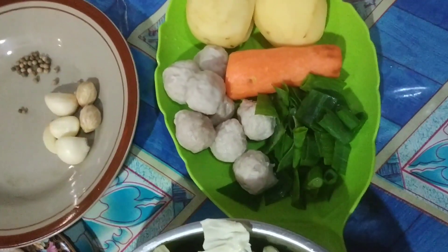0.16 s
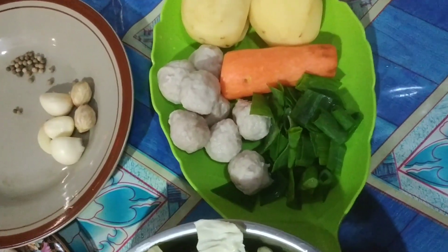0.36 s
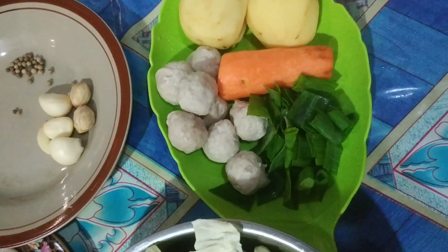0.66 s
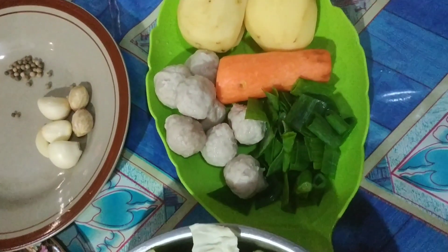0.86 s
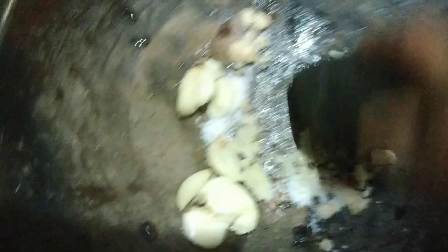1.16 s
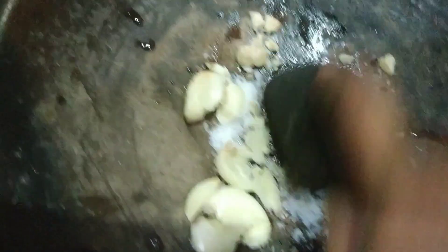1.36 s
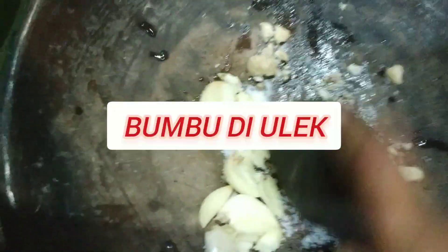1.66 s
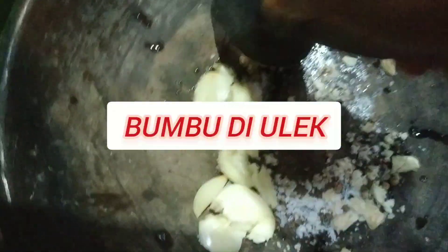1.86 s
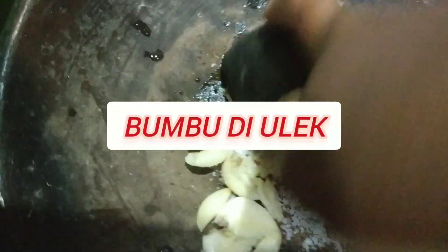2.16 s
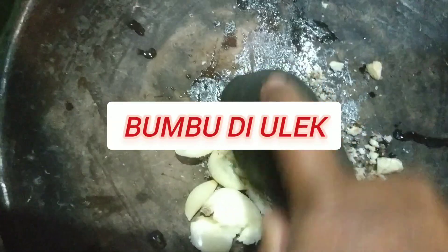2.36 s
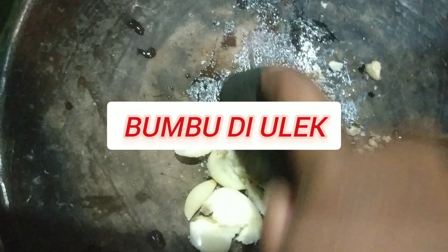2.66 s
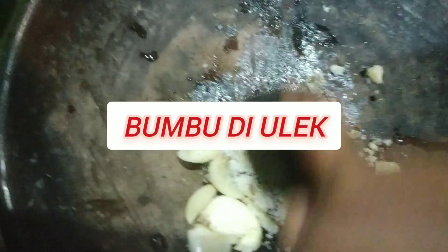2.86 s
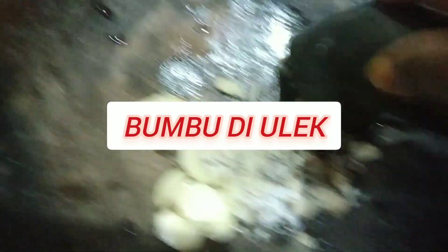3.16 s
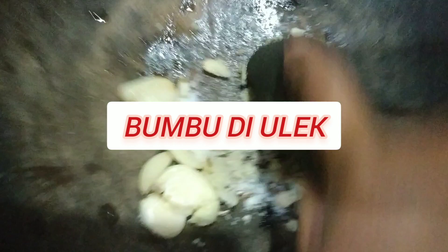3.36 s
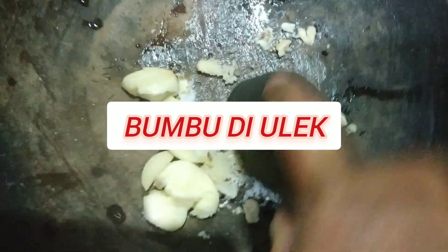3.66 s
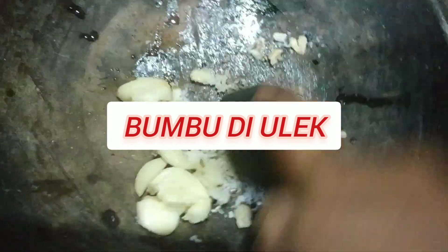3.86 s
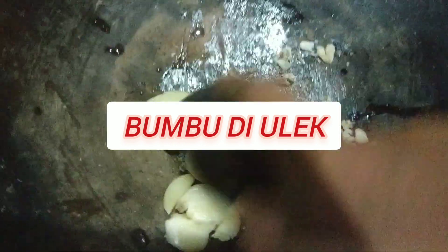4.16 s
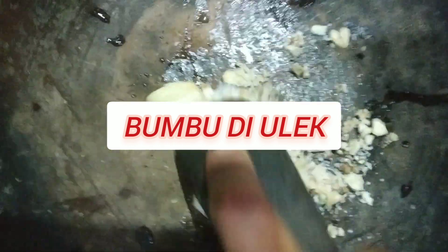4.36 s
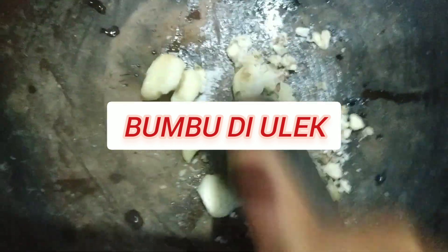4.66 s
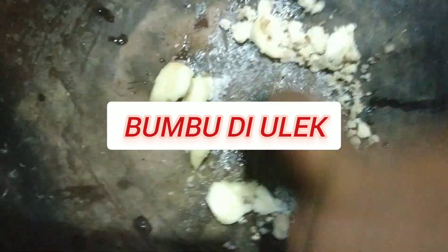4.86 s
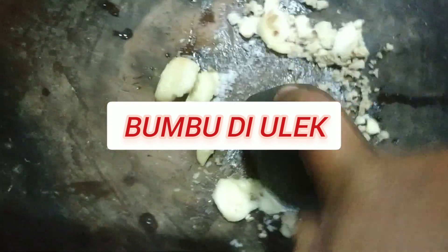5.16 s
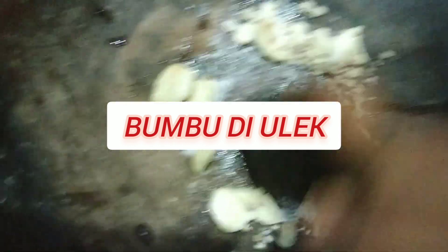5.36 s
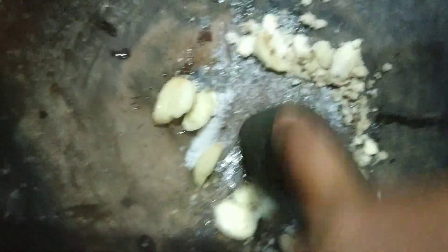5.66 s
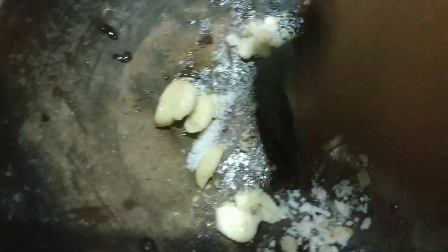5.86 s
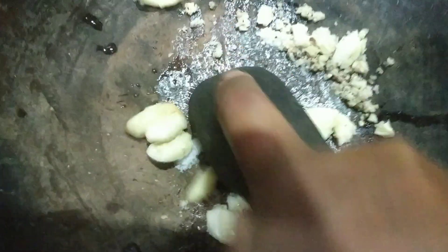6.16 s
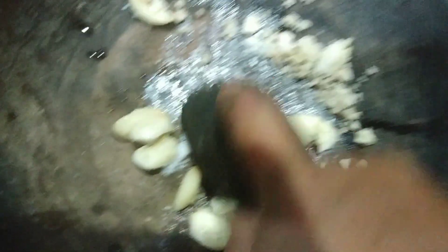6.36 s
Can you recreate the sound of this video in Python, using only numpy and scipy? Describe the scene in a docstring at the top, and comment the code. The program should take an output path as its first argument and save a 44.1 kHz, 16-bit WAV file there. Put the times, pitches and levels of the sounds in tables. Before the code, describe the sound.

Low room murmur and hiss, a short dead silence, then a stone pestle grinding garlic, salt and seeds in a stone mortar with gritty crunches.

```python
"""A stone pestle grinds salt, seeds and garlic in a stone mortar, about seven pushes a second, in a quiet kitchen.
Each push crushes a stream of grit: random fractures that hiss, ring the stone and shake the table.
Seeds burst as short dense fracture bursts; the pestle knocks dully, as damped modes, when it drops off them.
Murmur and hiss come first, then a moment of silence, then the grinding over a faint added drone.
Two microphones of a phone just above the bowl differ in level, phase and likeness by frequency."""
import sys
import numpy as np
from scipy import signal
from scipy.fft import rfft, irfft
from scipy.io import wavfile
from scipy.ndimage import uniform_filter1d

SR = 44100
rng = np.random.default_rng(int(sys.argv[2]) if len(sys.argv) > 2 else 0)


def transcribe(u):
    """Save the signal u as a 16-bit wav file named by the first command-line argument.

    u: samples, shape (n,) or (channels, n), limited to [-1, 1]; the rate is SR.
    q: integer samples, one column per channel.
    """
    v = np.clip(np.atleast_2d(u).T, -1, 1)
    q = np.round(v * 32767).astype(np.int16)
    wavfile.write(sys.argv[1], SR, q)


N = 287973
TIME = np.arange(N) / SR
FREQS = np.fft.rfftfreq(N, 1 / SR)

# silent span: start_s, end_s
SILENCE_S = (1.1, 1.449)
# bursting seeds and salt crystals: time_s, level_db, fall_db (drop onto the stone, re level_db)
BURSTS = [(1.625, -4, -24), (1.6467, -4, -26), (1.909, -11, -10.5), (2.091, -5.5, -20),
          (2.6707, 0.5, -22.5), (3.117, -26, -39), (3.1929, -10, -6.5), (3.26, -8, -26),
          (3.2661, -7, -14.5), (3.301, -4.5, -12), (3.346, -7, -8.5), (3.3702, -4, -34), (3.376, -8, -31),
          (3.5783, -5, -13), (3.6143, -3, -17), (4.28, -13, -9.5), (4.5393, -7, -7.5), (5.026, -2, -27),
          (5.129, -13, -34), (5.273, -12, -25), (5.4335, -15, -25), (5.878, -9.5, -11.5),
          (5.937, -17.5, -15.5), (6.062, -11, -10.5)]
# sharp modes of mortar and pestle: pitch_hz, width_hz, relative_db
STONE_MODES = [(1273, 82, -3.5), (1343, 69, -4.5), (1500, 220, -1), (1768, 200, -1), (1840, 76, -11)]
# spectrum of a sharp snap: freq_hz, relative_db
SNAP_SPECTRUM = [(200, -10.5), (700, -1.5), (1300, -12), (2500, 7.5), (4700, 5), (8000, 2), (12000, -6),
                 (16000, -7)]


def amp(db):
    """Decibels to gain."""
    return 10 ** (np.asarray(db) / 20)


def unit(x):
    """Scales to an rms of one."""
    return x / np.sqrt(np.mean(x ** 2) + 1e-20)


def read(points, hz):
    """Interpolates a table along a log-frequency axis."""
    f, value = np.transpose(points)
    return np.interp(np.log(hz + 1), np.log(f + 1), value)


def read_time(points, s):
    """Interpolates a table linearly in time."""
    point_s, value = np.transpose(points)
    return np.interp(s, point_s, value)


def add(mix, s, sound):
    """Mixes a sound in at time s."""
    part = mix[..., max(round(s * SR), 0):][..., :sound.shape[-1]]
    part += sound[..., :part.shape[-1]]


def pan(pan_db):
    """Left and right gains, pan_db apart."""
    return amp([[pan_db / 2], [-pan_db / 2]])


def filter_unit_energy(x, taps):
    """Convolves both channels with taps scaled to unit energy."""
    return signal.oaconvolve(x, taps[None] / np.linalg.norm(taps), axes=1)[:, :N]


def colour(x, spectrum, size=2048):
    """Minimum-phase filter of unit energy with the given spectrum."""
    log_gain = np.log(amp(read(spectrum, abs(np.fft.fftfreq(size, 1 / SR)))))
    taps = np.fft.ifft(np.exp(np.conj(signal.hilbert(log_gain)))).real
    return filter_unit_energy(x, taps)


def resonate(x, modes, size=2048):
    """Bank of exponentially damped resonances of unit energy."""
    t = np.arange(size) / SR
    taps = np.zeros(size)
    for hz, width_hz, db in modes:
        decay = np.exp(-np.pi * width_hz * t)
        taps += amp(db) * width_hz * decay * np.cos(2 * np.pi * hz * t)
    return filter_unit_energy(x, taps)


def thin_lows(x):
    """High-pass: the scrape is thin below about 1.1 kHz."""
    return signal.sosfilt(signal.butter(5, 1080, "high", fs=SR, output="sos"), x)


def stone_ring(x, modes):
    """Stone modes rung by x, kept to a band of about 1.1 to 2.5 kHz."""
    low_pass = signal.butter(3, 2500, fs=SR, output="sos")
    return thin_lows(signal.sosfilt(low_pass, resonate(x, modes)))


def wander(per_s):
    """Smooth noise of unit rms, changing about per_s times a second."""
    width = int(SR / per_s)
    smooth = uniform_filter1d(rng.standard_normal(N), width)
    return unit(uniform_filter1d(smooth, width))


def drifting(x, depth=.03):
    """Resonances slide a little as the pestle's contact and the grip change: time runs unevenly."""
    speed = 1 + depth * np.tanh(wander(per_s=6))
    return np.interp(np.cumsum(speed) / SR, TIME, x)


def pair(x, likeness):
    """Spectra of two unrelated signals, blended to a given likeness."""
    a, b = rfft(x)
    same = np.clip(read(likeness, FREQS), -1, 1)
    return np.array([a, same * a + np.sqrt(1 - same ** 2) * b])


def ports(x):
    """The bowl reaches the two microphones by different paths: likeness, level and phase vary with frequency."""
    # freq_hz, likeness (-1 to 1)
    likeness = [(100, 1), (700, 0.83), (1200, 0.12), (2500, 0.3), (15000, 0)]
    # freq_hz, left_lead_rad
    lead = [(100, 1), (1120, -0.93), (1700, -2), (2330, -1.1), (2760, -4), (4390, -4.5), (8530, -9),
            (16000, -9)]
    # freq_hz, left_minus_right_db
    balance = [(100, -3), (700, -5.5), (1150, -4), (1400, -1), (1750, -4), (2300, 1.5), (5800, -2.5),
               (9000, 1), (14000, -6.5)]
    sides = np.array([[1], [-1]]) / 2
    z = pair(x, likeness) * amp(sides * read(balance, FREQS))
    z[1] *= np.exp(-1j * read(lead, FREQS))
    return irfft(z, N)


def grains(per_s, spread_db):
    """Tiny fractures at random moments, a few much larger than the rest."""
    size = amp(spread_db * np.minimum(rng.exponential(1, N), 4))
    happens = rng.random(N) < per_s / SR
    return unit(size * happens * rng.standard_normal((2, N)))


def ring_out(hits, decay_s):
    """Gives each hit an exponential tail."""
    return signal.lfilter([1], [1, -np.exp(-1 / (decay_s * SR))], hits)


def fineness(s):
    """Fineness of the grit under the pestle at time s."""
    # time_s, fineness (0 whole seeds, 1 powder)
    grind_state = [(1.5, 0.14), (1.68, 0.12), (2.1, 0.14), (2.45, 0.37), (2.75, 0.36), (3.05, 0.33),
                   (3.35, 0), (3.75, 0.33), (4.06, 0), (4.3, 0.65), (4.48, 0.26), (4.75, 0.68), (4.87, 1),
                   (5, 0.58), (5.13, 0.82), (5.55, 0.54), (6.13, 0.41), (6.3, 0.92)]
    return np.clip(read_time(grind_state, s), 0, 1)


def room_tone(murmur_db=-54, drone_hz=149, pass_width_hz=14, drone_db=-57):
    """Steady low murmur and a briefly swelling hiss, both filtered noise; a narrow-band drone joins after the silence."""
    # freq_hz, relative_db
    murmur_spectrum = [(30, -67), (86, -52), (150, -16.5), (215, -1.5), (290, -5), (426, -12), (800, -12),
                       (2000, -49)]
    # freq_hz, relative_db
    hiss_spectrum = [(300, -5.5), (1400, 1), (2500, -1), (5000, -5), (9000, -3.5), (12500, -9.5),
                     (16000, -8)]
    # time_s, level_db
    hiss_level = [(0, -53.5), (.28, -48.5), (.37, -50), (.41, -45), (.49, -46.5), (.53, -51), (1.5, -52)]
    # freq_hz, likeness between microphones
    air_likeness = [(200, 0.91), (640, 0.57), (1400, -0.013), (3000, 0.1)]
    murmur = amp(murmur_db) * unit(colour(rng.standard_normal((2, N)), murmur_spectrum))
    hiss = unit(colour(rng.standard_normal((2, N)), hiss_spectrum)) * amp(read_time(hiss_level, TIME))
    b, a = signal.iirpeak(drone_hz, drone_hz / pass_width_hz, fs=SR)
    drone = unit(signal.filtfilt(b, a, rng.standard_normal(N)))
    air = irfft(pair(murmur + hiss, air_likeness), N)
    return air + amp(drone_db) * drone * (TIME > SILENCE_S[1])


def kitchen(x, size=16384):
    """Sparse random wall reflections, the treble dying first."""
    # freq_hz, t60_s
    decay_times = [(200, 0.56), (1500, 0.26), (15000, 0.12)]
    taps = rng.standard_normal((2, size)) * (rng.random((2, size)) < 3000 / SR)  # 3000 reflections/s
    taps[:, :SR // 300] = 0  # first reflection after 3.3 ms
    hz, t, z = signal.stft(taps, SR, nperseg=256)
    decay = amp(-60 * t / read(decay_times, hz)[:, None])
    tail = signal.istft(z * decay, SR, nperseg=256)[1]
    return signal.fftconvolve(x, tail / np.linalg.norm(tail[0]), axes=1)[:, :N]


def crumbs(db=-43, per_s=22, die_s=0.0082):
    """Loose grit ticks at random after the silence, even between pushes: decaying noise bursts."""
    size = np.minimum(rng.exponential(1, N), 2)
    starts = (rng.random(N) < per_s / SR) * size * (TIME > SILENCE_S[1])
    ticks = ring_out(starts, die_s)
    return amp(db) * ports(colour(ticks * rng.standard_normal((2, N)), SNAP_SPECTRUM))


def struck(modes, t, onset_s):
    """Damped modes with a joint peak of one, each detuned at random by up to 7 % for where the pestle lands."""
    ring = np.zeros(len(t))
    for hz, db, t60_s in modes:
        pitch_hz = hz * rng.uniform(.93, 1.07)
        ring -= amp(db - 60 * t / t60_s) * np.sin(2 * np.pi * pitch_hz * t)
    ring = ring * (1 - np.exp(-t / onset_s))
    return ring / abs(ring).max()


def blows(drop_edge_db=0.5):
    """Every knock: slips off lumps, and the short fall through each burst seed."""
    # pestle slipping off a lump onto the stone: time_s, level_db, hard_edge_db (re level_db)
    slips = [(1.613, -28.5, 15), (1.686, -15.5, -6), (1.712, -29.5, 0), (1.753, -24, -10),
             (2.023, -19, 8.5), (2.056, -17, -2), (2.184, -21.5, -1.5), (2.218, -22.5, -10),
             (3.213, -29, 3), (3.409, -10.5, -6), (3.432, -20, 6), (3.473, -12, -10), (3.506, -9.5, -6),
             (3.532, -15.5, 4.5), (3.564, -17, 3.5), (4.042, -6, -10), (4.086, -24.5, 7.5),
             (4.292, -15.5, -23), (4.438, -9.5, -5), (4.451, -21, 5.5), (4.479, -11, -19),
             (4.571, -10.5, -26), (4.691, -4.5, -10.5), (4.801, -22.5, 0.5), (5.521, -13.5, -20),
             (5.565, -20.5, -2), (5.86, -18.5, -18), (6.183, -7.5, -4)]
    drops = [(s, db + fall_db, drop_edge_db) for s, db, fall_db in BURSTS]
    return list(slips) + drops


def knocks(contact_s=0.001, edge_s=0.0075, spread_s=0.01, pan_db=-2, delay_s=.001, thud_follow=0.63):
    """Stone on stone, cushioned by paste: a short modal ring, a hard noise edge and a longer table thud."""
    # bowl modes: pitch_hz (nominal), relative_db, t60_s
    bowl_modes = [(748, 0, 0.017), (918, 0.5, 0.011), (1137, 9, 0.01), (1455, -23, 0.017)]
    # table and mortar-foot modes: pitch_hz (nominal), relative_db, t60_s
    thud_modes = [(150.3, -7.5, 0.15), (228.4, 1, 0.095), (269.8, 2.5, 0.084), (379.5, -4.5, 0.073),
                  (723, -19, 0.17)]
    # thud of a full-scale knock, by the pestle's place in the bowl: time_s, level_db
    thud_reach = [(1.7, -20.5), (2.7, -25.5), (3.5, -16.5), (4.05, -22), (4.3, -14), (4.7, -22.5),
                  (6.2, -22.5)]
    # freq_hz, relative_db
    edge_spectrum = [(600, -20), (1400, 8), (2000, 1.5), (2700, 0.5), (5000, -22)]
    t = np.arange(SR // 4) / SR
    body, edge = np.zeros((2, N))
    for s, db, edge_rel_db in blows():
        start_s = s + delay_s
        thud_db = read_time(thud_reach, s) + thud_follow * db
        add(body, start_s, amp(db) * struck(bowl_modes, t, contact_s))
        add(body, start_s, amp(thud_db) * struck(thud_modes, t, spread_s))
        add(edge, start_s, amp(db + edge_rel_db) * np.exp(-t / edge_s))
    hard_edge = colour(edge * rng.standard_normal((2, N)), edge_spectrum)
    return pan(pan_db) * body + ports(hard_edge)


def cracks(snap_db=-4, ring_db=4, pan_db=6, onset_s=0.0013, whole_seed_decay_s=0.0051, powder_decay_db=-10):
    """A seed gives way in a burst of fractures that dies in milliseconds, sooner the finer the grit."""
    t = np.arange(SR // 16) / SR
    burst, ring = np.zeros((2, N))
    for s, db, fall_db in BURSTS:
        decay_s = whole_seed_decay_s * amp(powder_decay_db * fineness(s))
        shape = amp(db) * (1 - np.exp(-t / onset_s)) * np.exp(-t / decay_s)
        add(burst, s, shape)
        add(ring, s, shape * amp(fall_db))
    fractures = grains(per_s=14000, spread_db=1)
    snap = amp(snap_db) * pan(pan_db) * ports(colour(burst * fractures, SNAP_SPECTRUM))
    return snap + ports(amp(ring_db) * stone_ring(ring * fractures, STONE_MODES))


def push_level(law, peak_share=0.51, squareness=2.76, drag_db=-15.5, drag_s=0.092):
    """Left/right level of one scrape part: pushes swell, fade and drag on, sized by force and fineness."""
    # pushes of the pestle: start_s, length_s (without drag), force_db
    pushes = [(1.495, 0.1, -25.5), (1.619, 0.072, -30), (1.678, 0.12, -40), (1.963, 0.083, -18.5),
              (2.092, 0.09, -26.5), (2.265, .064, -17), (2.366, 0.11, -30), (2.561, 0.066, -20),
              (2.7, 0.081, -28), (2.838, 0.09, -20.5), (2.969, 0.1, -25), (3.235, 0.26, -33),
              (3.338, 0.049, -22.5), (3.487, 0.14, -26.5), (3.68, 0.09, -24.5), (3.851, 0.06, -23),
              (3.945, 0.11, -20), (4.292, 0.056, -20.5), (4.333, 0.07, -22.5), (4.424, 0.084, -22),
              (4.524, 0.094, -25), (4.639, .07, -25), (4.707, 0.064, -20.5), (4.808, 0.1, -26.5),
              (4.951, 0.095, -25), (5.097, 0.081, -25.5), (5.206, 0.093, -26.5), (5.363, 0.089, -23.5),
              (5.478, 0.09, -17.5), (5.622, 0.08, -20), (5.746, .11, -23), (6.054, 0.03, -24.5),
              (6.092, 0.085, -18), (6.183, 0.13, -35.5), (6.361, 0.084, -22), (6.484, 0.072, -37.5)]
    coarse_db, powder_db, follow, pan_db = law
    slow_s = np.linspace(0, TIME[-1], num=9000)
    power = np.zeros(len(slow_s))
    for start_s, length_s, force_db in pushes:
        rise_s = length_s * peak_share
        t = slow_s - start_s - rise_s
        side_s = np.where(t < 0, rise_s, length_s - rise_s)
        swell = np.exp(-abs(t / side_s) ** squareness)
        drag = amp(drag_db) * (t > 0) * np.exp(-abs(t) / drag_s)
        power += amp(follow * force_db) ** 2 * (swell ** 2 + drag ** 2)
    level = np.sqrt(power) * amp(coarse_db + powder_db * fineness(slow_s))
    return pan(pan_db) * np.interp(TIME, slow_s, level)


def crunch(judder_db=2.36, clump_db=1, pops_per_s=45, pop_decay_s=.001):
    """Fast judder of stone on stone over clumps of grit, with flares where single crystals pop."""
    pops = (rng.random(N) < pops_per_s / SR) * np.minimum(rng.exponential(1, N), 1.3)
    flares = ring_out(pops, pop_decay_s)
    judder = amp(judder_db * wander(per_s=350) + clump_db * wander(per_s=87))
    return judder * (1 + flares)


def moving_echoes(x, hand_s=0.001088, rim_s=0.0026, travel=0.15, echo_db=-8):
    """Hand and rim throw the scrape back; path lengths wander as the pestle moves, so bands of colour drift."""
    out = x.copy()
    for ear in range(2):
        for delay_s in (hand_s, rim_s):
            path_s = delay_s * (1 + travel * np.tanh(wander(per_s=5.3)))
            out[ear] += amp(echo_db) * np.interp(TIME - path_s, TIME, x[ear])
    return out / np.sqrt(1 + 2 * amp(echo_db) ** 2)


def grinding(grit_db=-1, overtone_db=-5, ring_db=-2, fizz_db=-1):
    """Each push swells and fades a stream of fractures, which hiss, ring the stone and shake the table."""
    # laws: whole_seed_db, change_to_powder_db, db_per_db_of_force, left_minus_right_db
    grit_law = (0, 0, 1, 8.5)
    ring_law = (3, -14, 1, 2.5)
    fizz_law = (-10, 11.5, 0.93, 8)
    rumble_law = (-34.5, -6.5, 0.34, 3)
    # spectra: freq_hz, relative_db
    grit_spectrum = [(800, -52), (1250, -8.5), (1650, -2), (2150, -0.5), (2700, 7.5), (3300, 0.5),
                     (4700, 4), (5700, 2.5), (7500, -3), (9000, -5.5), (12000, -7), (16000, -38)]
    fizz_spectrum = [(4000, -20), (7000, 0), (8700, 0.5), (10500, -5), (12500, -6), (15800, -10.5),
                     (16500, -24)]
    table_spectrum = [(60, -44), (110, -23), (150, -6), (240, -0.5), (400, -1.5), (550, -8.5), (720, -7),
                      (900, -7.5), (2500, -54.5)]
    # higher stone modes, and the mortar's bell mode: pitch_hz, width_hz, relative_db
    overtone_modes = [(2460, 96, 4), (2500, 99, -12), (2987, 140, 6.5), (3660, 31, 12.5), (4615, 143, 10),
                      (5600, 890, -34), (6790, 76, 10), (8660, 340, -4)]
    bell_mode = [(1173.5, 55, 0)]
    # how the pestle's place in the bowl favours the bell mode: time_s, gain_db
    bell_share = [(2, -5), (3, -19.5), (4, -5.5), (5, -3), (5.6, -1.5), (6.2, -0.5)]

    grit, ring, fizz, rumble = map(push_level, (grit_law, ring_law, fizz_law, rumble_law))
    judder = crunch()
    crush = unit(grains(per_s=11000, spread_db=3) * judder)
    powder = unit(grains(per_s=14000, spread_db=1.5) * judder)

    overtones = np.array([drifting(ear) for ear in resonate(crush, overtone_modes)])
    scratch = amp(grit_db) * colour(crush, grit_spectrum) + amp(overtone_db) * overtones
    powder_hiss = amp(fizz_db) * fizz * ports(colour(powder, fizz_spectrum))
    scrape = grit * ports(scratch) + powder_hiss

    ring_level = amp(ring_db) * ring
    bell = amp(read_time(bell_share, TIME)) * stone_ring(ring_level * crush, bell_mode)
    stone = np.array([drifting(ear, depth=.02) for ear in stone_ring(crush, STONE_MODES)])
    table_shake = colour(rumble * crush, table_spectrum)
    body = bell + ring_level * stone + table_shake
    return thin_lows(moving_echoes(scrape)) + ports(body)


def scene(wet_db=-19):
    """The mortar close by, in a small kitchen."""
    mortar = grinding() + cracks() + crumbs() + knocks()
    return mortar + amp(wet_db) * kitchen(mortar) + room_tone()


def record(dry, low_cut_hz=85, cutoff_hz=16100):
    """Deep bass is cut away; the silent span is muted; then full-scale clipping and a low-pass."""
    thinned = signal.sosfilt(signal.butter(3, low_cut_hz, "high", fs=SR, output="sos"), dry)
    sounding = (TIME < SILENCE_S[0]) | (TIME > SILENCE_S[1])
    gate = uniform_filter1d(1. * sounding, size=128)  # 3 ms fades
    low_pass = signal.firwin(511, cutoff_hz, window=("kaiser", 9), fs=SR)
    return signal.oaconvolve(np.clip(thinned * gate, -1, 1), low_pass[None], "same")


dry = scene()
out = record(dry)
transcribe(out)
```